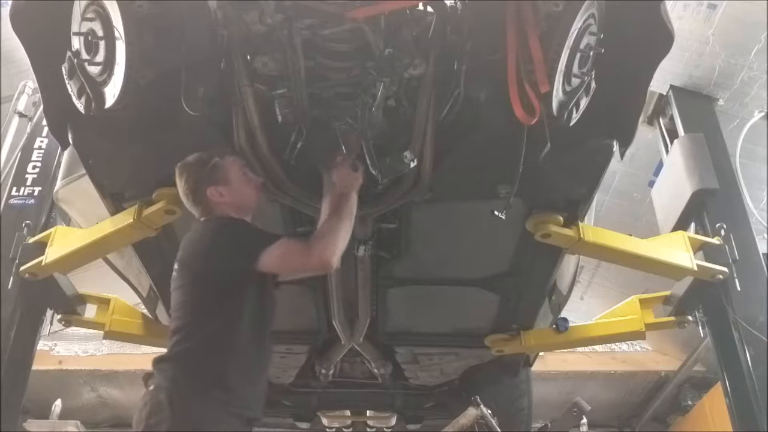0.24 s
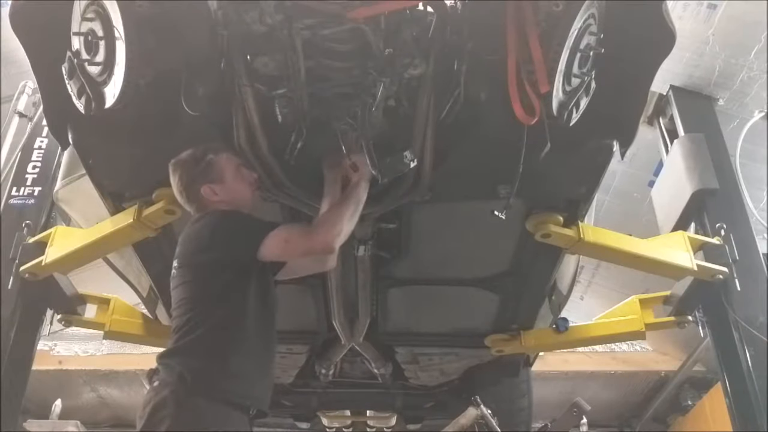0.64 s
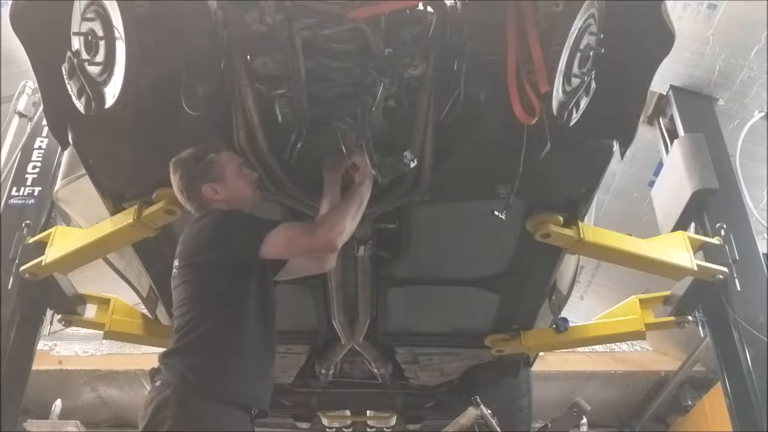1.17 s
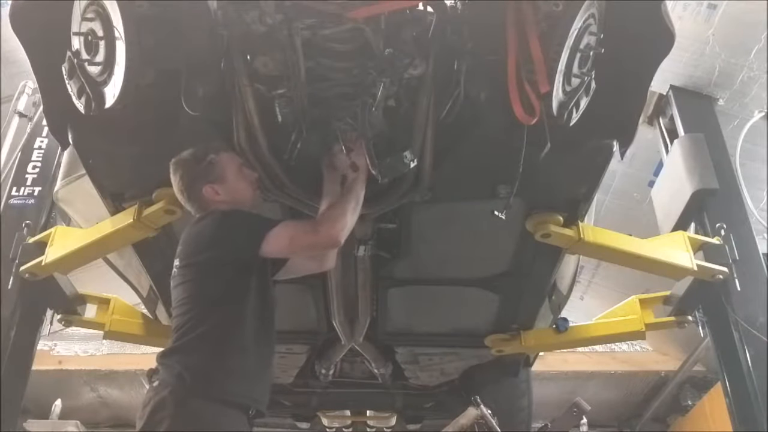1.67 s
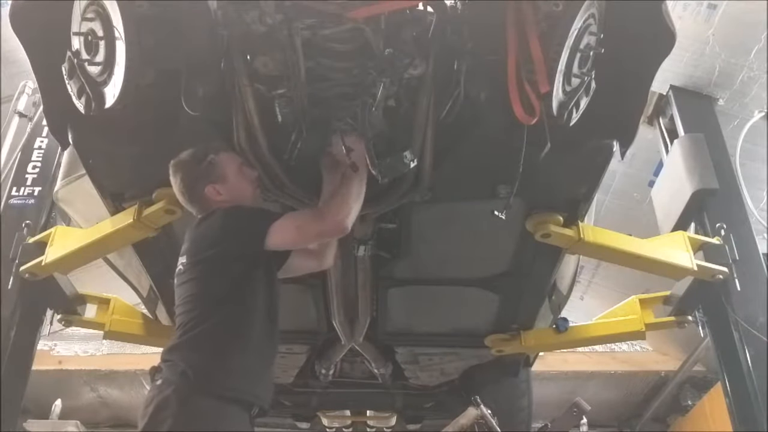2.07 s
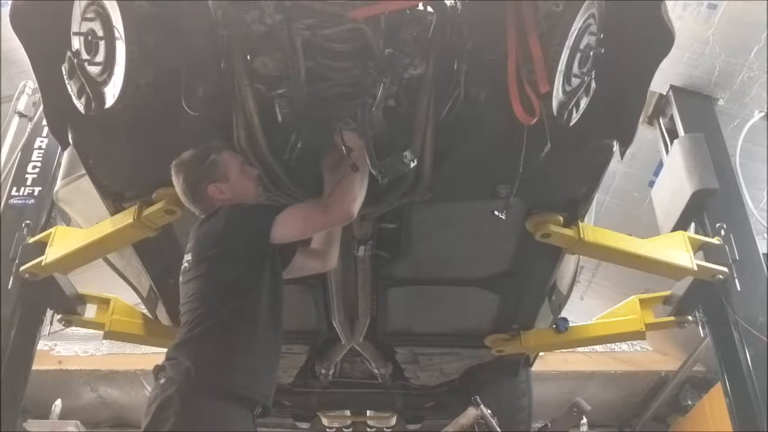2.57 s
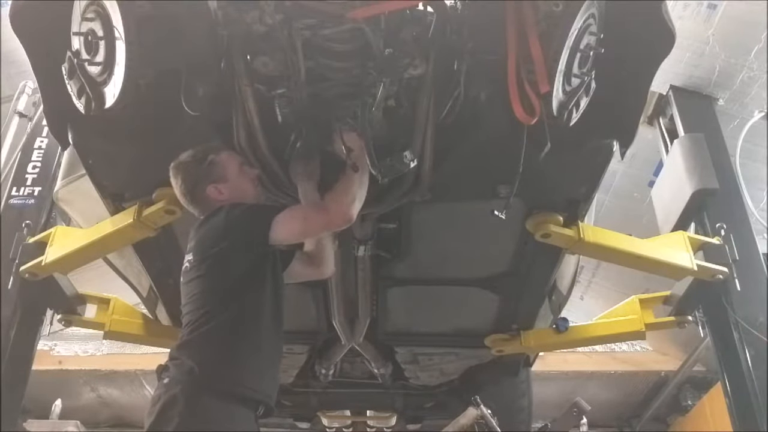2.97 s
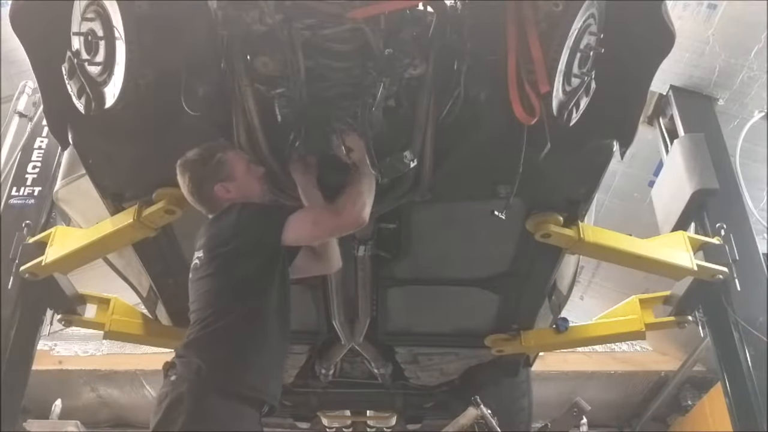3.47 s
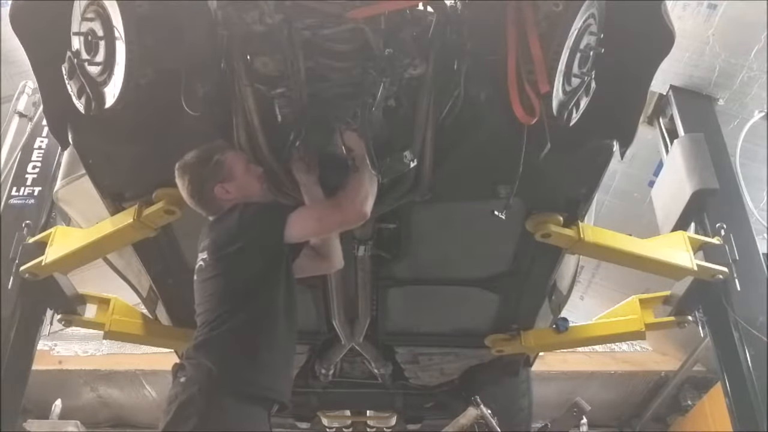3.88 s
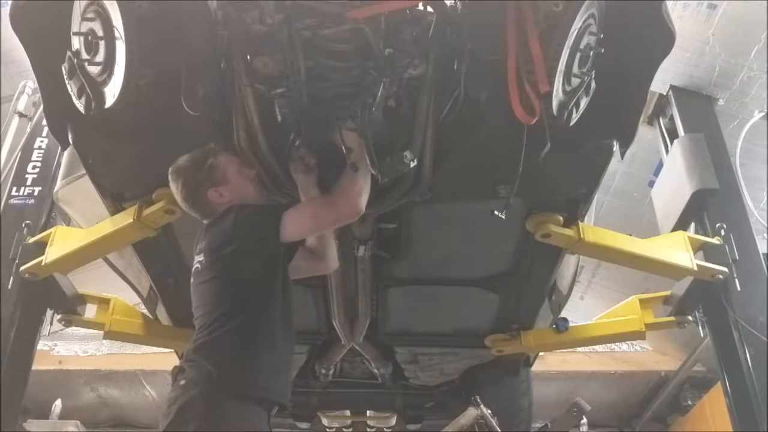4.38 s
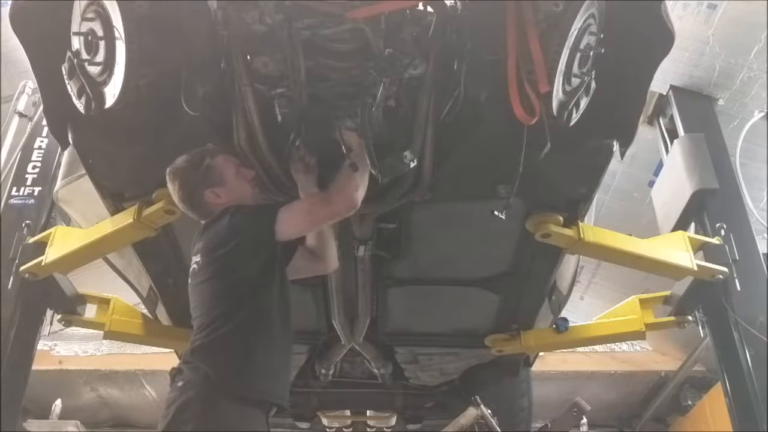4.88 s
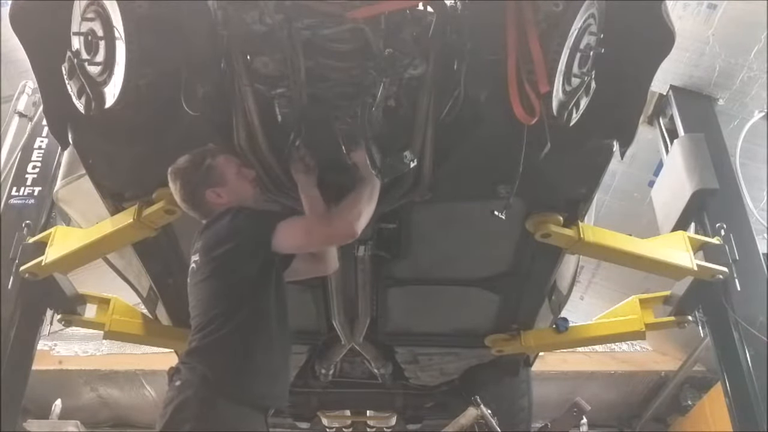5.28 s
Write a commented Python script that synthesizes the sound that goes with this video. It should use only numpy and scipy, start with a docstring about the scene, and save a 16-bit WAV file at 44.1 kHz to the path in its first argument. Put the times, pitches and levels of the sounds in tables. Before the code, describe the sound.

A mono garage scene, with dull, low ventilation and a very faint mains hum throughout. After a barely audible touch at 0.1 s, a rubber hammer strikes steel under a lifted car at 0.7, 1.0, 1.25 and 1.5 s, growing louder and fuller. Each blow is a sharp snap and clank with crowded metallic ringing that dies in about half a second into a short room echo. After a pause, softer, looser knocks fall at 2.3 and 2.7 s, with brief gritty grating just before them, then small bright clinks at 2.8 and 3.0 s. Another scrape leads to a blow at 3.7 s, followed by a strong one at 4.1 s and others at 4.4, 4.7 and 4.95 s, the part now thudding and zinging loosely, with a harsh scrape at 4.4 s. A thin, unsteady squeak around 5.1 s lingers faintly, and a light high clink follows at 5.2 s before only background remains.

```python
"""In a garage, a mechanic under a lifted car taps at bolts with a rubber hammer until a steel part comes loose.
Each blow rings the part and the underbody: decaying modes over a snap of filtered noise, with a brief room tail.
The part grates in its seat as dense runs of tiny contacts, clinks lightly, and once squeaks as a thin tone.
Mains hum from wavering sines and dull ventilation from filtered noise lie underneath.
"""
import sys
import numpy as np
from scipy import signal
from scipy.fft import rfft, irfft, next_fast_len
from scipy.io import wavfile
from scipy.ndimage import uniform_filter1d

SR = 44100
rng = np.random.default_rng(int(sys.argv[2]) if len(sys.argv) > 2 else 0)


def master_out(mix):
    """Clip the mix to full scale and print it as 16-bit PCM to the path in sys.argv[1]."""
    frames = np.transpose(np.atleast_2d(mix))
    ceiling = np.clip(frames, -1, 1)
    pcm = np.round(ceiling * 32767).astype(np.int16)
    wavfile.write(sys.argv[1], SR, pcm)


N = 244005

# Thud, body, clank, crack and zing bands of a contact: low_hz, high_hz
BANDS_HZ = [(180, 450), (450, 900), (900, 2500), (2500, 5500), (5500, 16000)]
RING = np.arange(int(0.55 * SR)) / SR  # time axis of one contact's answer, seconds


def undb(db):
    """Decibels to gain."""
    return 10 ** (np.asarray(db) / 20)


def unit(x):
    """Scale to rms 1."""
    return x / np.sqrt(np.mean(x ** 2))


def fade(t60):
    """A free decay that loses 60 dB in t60 seconds."""
    return np.exp(-np.log(1000) * RING / t60)


def add(out, start_s, x):
    """Mix x into out from start_s, cutting what runs past the end."""
    i = max(int(start_s * SR), 0)
    out[i:i + len(x)] += x[:len(out) - i]


def colour(x, points):
    """Minimum-phase filter through (Hz, dB) points, so nothing sounds ahead of its contact."""
    size = 2 * next_fast_len(len(x))
    points_hz, points_db = np.transpose(points)
    bins_hz = np.arange(size // 2 + 1) * SR / size
    gain = undb(np.interp(np.log(bins_hz + 1), np.log(points_hz), points_db))
    # folding the cepstrum forward in time gives the causal phase
    cepstrum = irfft(np.log(gain))
    cepstrum[1:size // 2] *= 2
    cepstrum[size // 2 + 1:] = 0
    response = np.exp(rfft(cepstrum))
    return irfft(rfft(x, size) * response)[:len(x)]


def walk(rate, size):
    """Smooth random drift with a spread near 1, drawing rate new values per second."""
    k = int(SR / rate)
    steps = np.repeat(rng.standard_normal(N // k + 1), k)
    smooth = uniform_filter1d(uniform_filter1d(steps, k), k)
    return unit(smooth)[:size]


def garage():
    """Dull moving air as filtered noise, and mains hum as sines wavering in level and phase."""
    # Ventilation spectrum, relative: freq_hz, density_db (per Hz)
    air_points = [(20, -21), (40, -11), (60, 0.5), (88, 2), (110, -6.5), (180, -11), (290, -19),
                  (400, -15.5), (700, -12.5), (950, -18), (2300, -29), (8200, -38), (10000, -46.5),
                  (16000, -50.5)]
    # Mains hum, mean level before its wavering: freq_hz, level_db
    hum_tones = [(119, -56), (240, -62), (360, -66)]
    air_db = -50.2 + 0.1 * walk(4.87, N)
    air = unit(colour(rng.standard_normal(N), air_points)) * undb(air_db)
    t = np.arange(N) / SR
    hum = np.zeros(N)
    for hz, db in hum_tones:
        level = np.sqrt(2) * undb(db + 2.7 * walk(3.9, N))  # rms to peak
        hum += level * np.sin(2 * np.pi * hz * t + 0.5 * walk(3.02, N))
    return air + hum


def steel(shared, ring_db, same=0.65, early_db=3, early_t60=0.28, snap_db=11, snap_t60=0.057,
          room_t60=0.34, room_low_t60=0.51, ripple_db=1.5):
    """Answer to one contact: a snap, crowded modes dying into the garage's echo, and the clear modes."""
    # Clear modes of part and underbody, before small chance shifts: freq_hz, level_db, t60_s
    modes = [(252.4, -8.5, 0.27), (312.3, -4.5, 0.26), (326.5, -4, 0.29), (407, -16, 0.56),
             (441.3, -11, 0.41), (453.3, -5.5, 0.36), (541.4, -0.5, 0.26), (573, -3, 0.23), (651, -9, 0.32),
             (658, -10.5, 0.34), (708, -4, 0.27), (800, -4, 0.18), (859, -8.5, 0.25), (1076.4, -0.5, 0.11),
             (1118, -7.5, 0.2), (1307, -15, 0.4), (1340, -4, 0.16), (1620, -22, 0.71), (1883, -16, 0.48),
             (1917, -8.5, 0.26), (2280, -19, 0.37), (3250, -19, 0.27), (5740, -19, 0.12), (7760, -23, 0.37),
             (8130, -4, 0.33)]
    # Spectrum of the many short, crowded modes: freq_hz, density_db (per Hz)
    clatter = [(70, -25.5), (170, -9), (260, -3.5), (680, 2), (930, -4), (1300, -2.5), (1950, -3),
               (2650, -14), (3400, -10.5), (4500, -12), (7000, -3.5), (8300, -3), (9400, -16),
               (13000, -29.5)]
    same = np.clip(same, 0, 1)  # how much of the noise every contact has in common
    noise = same * shared + np.sqrt(1 - same ** 2) * rng.standard_normal(len(RING))
    low = signal.sosfilt(signal.butter(1, 2000, fs=SR, output="sos"), noise)
    high = noise - low

    # the treble snaps at once; the heavy panels need a moment to get going
    build = 1 - np.exp(-RING / 0.0016)
    highs = high * (undb(snap_db) * fade(snap_t60) + undb(2.5) * fade(early_t60) + fade(room_t60))
    lows = low * build * (undb(early_db) * fade(early_t60) + fade(room_low_t60))

    # every contact point wakes some clusters of the upper modes and misses others
    clusters_hz = np.geomspace(900, 16000, 130)
    clusters_db = np.r_[0, ripple_db * rng.standard_normal(len(clusters_hz) - 1)]
    crowd = colour(colour(highs + lows, np.c_[clusters_hz, clusters_db]), clatter)

    ring = np.zeros(len(RING))
    chance = rng.standard_normal((len(modes), 2))
    for (hz, db, t60), (level_shift, pitch_shift), phase in zip(modes, chance, shared):
        mode_hz = hz * (1 + 0.0025 * pitch_shift)
        tone = np.sin(2 * np.pi * mode_hz * RING + phase)
        ring += undb(db + 1.84 * level_shift) * fade(t60) * tone
    return crowd + undb(ring_db) * ring * build


def strike(start_s, strength_db, weight_db, hardness_db, rub_db=0):
    """Band levels in dB: weight drives the lows, hardness the highs; a loose part thuds and zings more."""
    # How loosely the part sits, from first taps to last: time_s, looseness (0-1)
    looseness = [(1.5, 0.07), (2.3, 0.71), (4.1, 0.57), (4.4, 1)]
    loose = np.interp(start_s, *np.transpose(looseness))
    thud_db = -14 + 1.22 * weight_db + 13.5 * loose
    crack_db = -4.5 + hardness_db
    zing_db = -9 + hardness_db + 3 * loose + rub_db
    return strength_db + np.array([thud_db, weight_db, 0, crack_db, zing_db])


def weigh(x, levels_db, favoured_hz, lift_db, length_s):
    """Place and hardness of a contact favour one resonance and set each band's level over its first length_s."""
    resonance = signal.lfilter(*signal.iirpeak(favoured_hz, 10, fs=SR), x)
    x = x + (undb(lift_db) - 1) * resonance
    onset = x[:int(length_s * SR)]
    points = []
    for (lo, hi), db in zip(BANDS_HZ, levels_db):
        band = signal.sosfilt(signal.butter(4, (lo, hi), "band", fs=SR, output="sos"), onset)
        gain_db = db - 10 * np.log10(np.mean(band ** 2))
        points += [(lo * 1.15, gain_db), (hi / 1.25, gain_db)]  # inset, so neighbours blend
    return colour(x, points)


def knocks(shared):
    """Every hammer blow rings the same steel, with its own balance of thud and crack."""
    # Hammer blows: start_s, strength_db, weight_db, hardness_db, favoured_hz
    blows = [(0.129, -65.5, 10.5, -3, 475), (0.733, -38, 3, -1.5, 1470), (1.024, -34, 5, 0, 720),
             (1.2512, -32.5, 6, 3.7, 5400), (1.471, -32, 9.5, 3.5, 500), (2.329, -41.5, 5, 1.5, 1280),
             (2.6878, -39, 1.6, 1.5, 460), (3.7177, -35.5, 5, -3, 1030), (4.081, -32.5, 1.5, -1.5, 1150),
             (4.4218, -36, 7.5, -2.5, 1050), (4.703, -37.5, -1.5, 0, 3210), (4.9582, -36.2, 7.1, 5.3, 660)]
    out = np.zeros(N)
    for start_s, strength_db, weight_db, hardness_db, favoured_hz in blows:
        knock = steel(shared, ring_db=-5.5)
        levels_db = strike(start_s, strength_db, weight_db, hardness_db)
        add(out, start_s, weigh(knock, levels_db, favoured_hz, lift_db=7.5, length_s=0.06))
    return out


def grating(shared, slips_hz=1500, scatter_db=4):
    """The part sticks and slips: a dense random run of tiny contacts, each answered by the steel."""
    # Slips in the seat; swell is the rise or fall by the slip's end, strength is before a 1 dB cut in the mix:
    # start_s, length_s, swell_db, strength_db, weight_db, hardness_db, favoured_hz
    slips = [(0.134, 0.072, -6, -63.5, -3, 6, 8550), (2.306, .026, 1, -40, -13.5, 4, 8160),
             (2.642, 0.046, 2.5, -52, 5.5, -3.5, 8050), (3.672, 0.058, -11, -51.5, 4, -8, 870),
             (4.396, 0.027, -7.5, -33.5, -2, 4.5, 6440), (4.708, 0.018, 17, -44, -7, -2, 920)]
    out = np.zeros(N)
    for start_s, length_s, swell_db, strength_db, weight_db, hardness_db, favoured_hz in slips:
        hits = rng.random(len(RING)) < slips_hz / SR
        grains = hits * undb(scatter_db * rng.standard_normal(len(RING)))
        grains *= rng.choice([-1, 1], len(RING))
        grains[0] = 2  # a firm jolt as it breaks free
        swell = undb(swell_db * np.minimum(RING / length_s, 1))
        force = (grains * swell)[:int(length_s * SR)]
        answer = steel(shared, ring_db=-32, snap_db=16)
        # sliding steel zings more than struck steel
        levels_db = strike(start_s, strength_db, weight_db, hardness_db, rub_db=5)
        scrape = signal.fftconvolve(force, answer)
        add(out, start_s, weigh(scrape, levels_db, favoured_hz, lift_db=5.5, length_s=length_s))
    return out


def touch(level_db, pitch_hz):
    """Band levels in dB of a light touch: strongest at its pitch, falling gently below and steeply above."""
    centres_hz = np.sqrt(np.prod(BANDS_HZ, axis=1))
    octaves = np.log2(centres_hz / pitch_hz)
    below_db_per_oct, above_db_per_oct = 3.5, 9.5
    return level_db - np.maximum(-below_db_per_oct * octaves, above_db_per_oct * octaves)


def clinks(shared):
    """Loose steel touches lightly between and after the blows, ringing with a softer snap."""
    # Light clinks: start_s, level_db, pitch_hz
    touches = [(2.798, -46.5, 7000), (3.024, -47.5, 2550), (3.069, -55.5, 2400), (5.21, -47, 7800)]
    out = np.zeros(N)
    for start_s, level_db, pitch_hz in touches:
        clink = steel(shared, ring_db=-9, snap_db=5)
        levels_db = touch(level_db, pitch_hz)
        add(out, start_s, weigh(clink, levels_db, pitch_hz, lift_db=2, length_s=0.06))
    return out


def squeak(echo_t60=0.89, echo_db=-3.5):
    """One thin, slightly unsteady tone swells as the loose part shifts, and lingers in the garage."""
    # Faint squeak of steel on steel: start_s, length_s, pitch_hz, level_db
    start_s, length_s, pitch_hz, level_db = (5.085, .085, 1548, -48.5)
    wobbling_hz = pitch_hz * (1 + 0.0055 * walk(150, len(RING)))
    phase = 2 * np.pi * np.cumsum(wobbling_hz) / SR
    progress = np.minimum(RING / length_s, 1)
    swell = np.sin(np.pi * progress) ** 2
    echo = undb(echo_db) * progress * fade(echo_t60)
    out = np.zeros(N)
    add(out, start_s, undb(level_db) * (swell + echo) * np.sin(phase))
    return out


def scene():
    """Knocks, grating, clinks and a squeak over the garage's background."""
    shared = rng.standard_normal(len(RING))  # the same steel and the same walls answer every contact
    background = garage()
    contacts = knocks(shared) + undb(-1.0) * grating(shared) + clinks(shared)
    return (background + contacts + squeak())[None]


def record(dry):
    """A steep elliptic low-pass removes the treble above 16.2 kHz."""
    return signal.sosfilt(signal.ellip(10, 0.2, 70, 16200, fs=SR, output="sos"), dry)


dry = scene()
out = record(dry)
master_out(out)
```